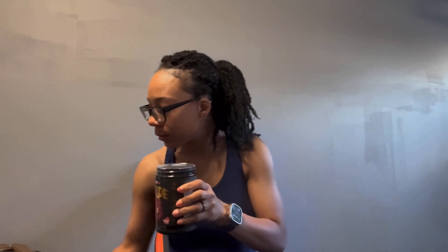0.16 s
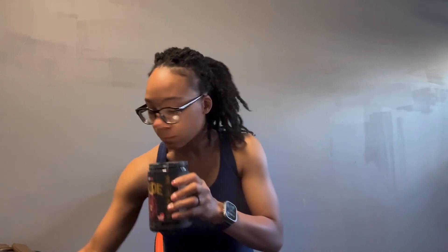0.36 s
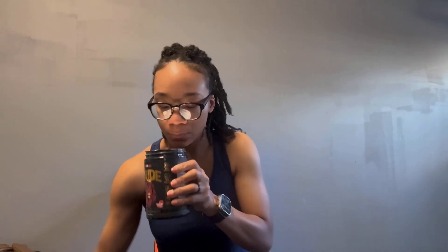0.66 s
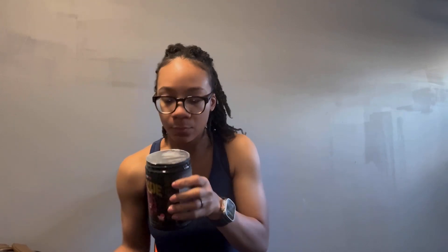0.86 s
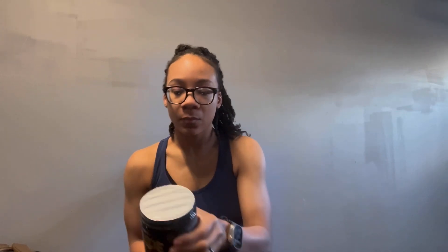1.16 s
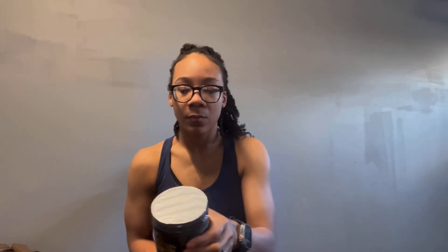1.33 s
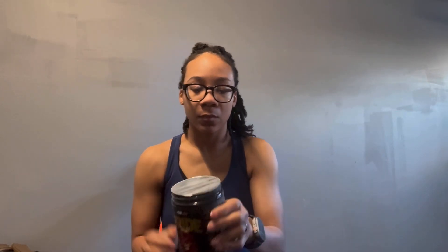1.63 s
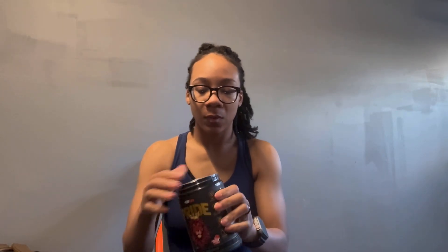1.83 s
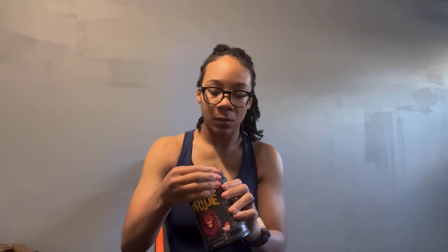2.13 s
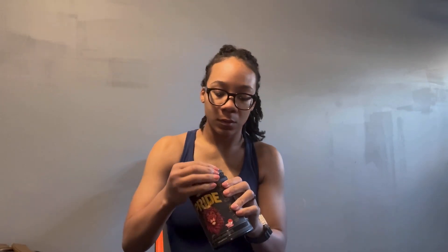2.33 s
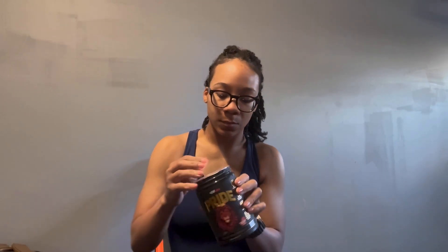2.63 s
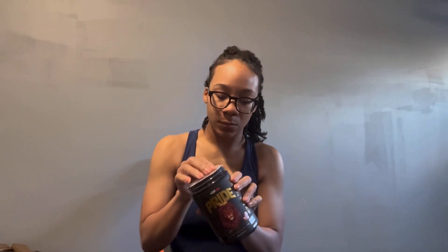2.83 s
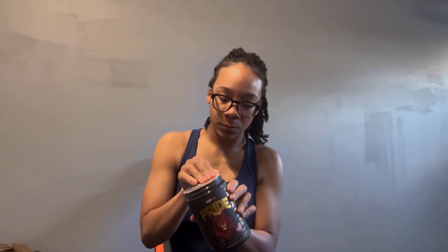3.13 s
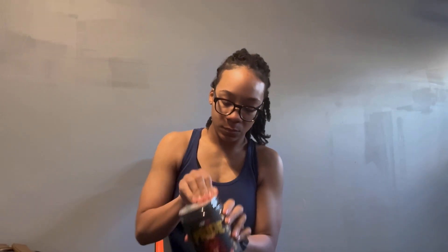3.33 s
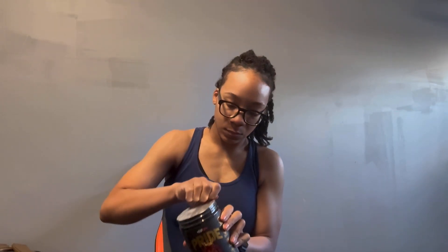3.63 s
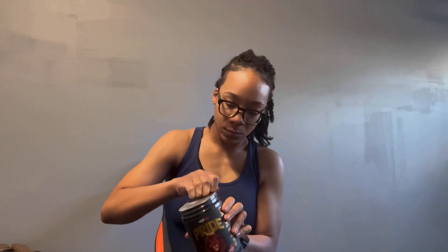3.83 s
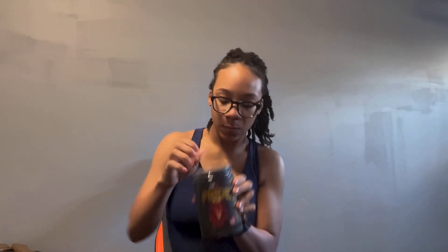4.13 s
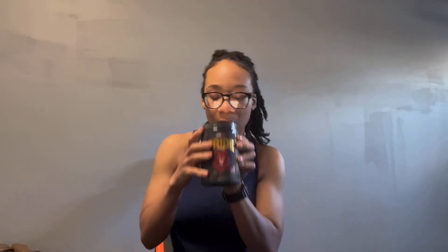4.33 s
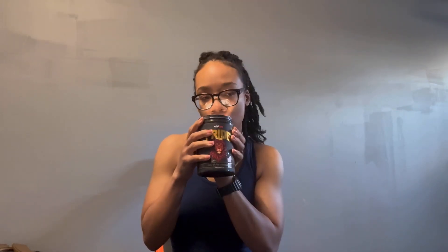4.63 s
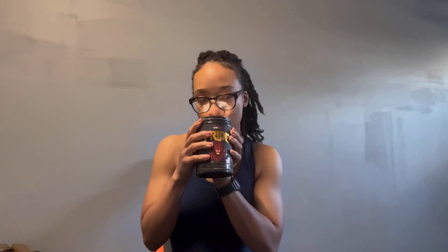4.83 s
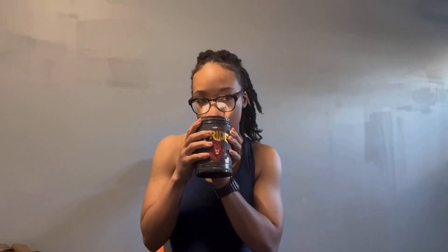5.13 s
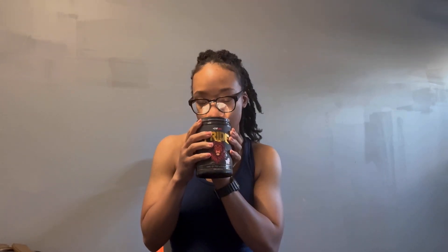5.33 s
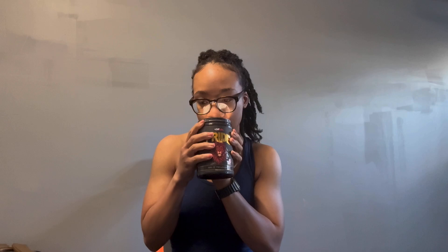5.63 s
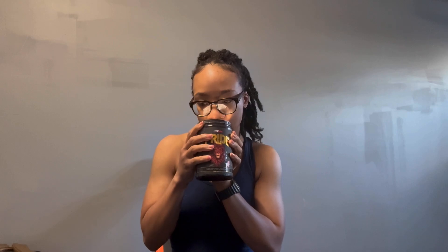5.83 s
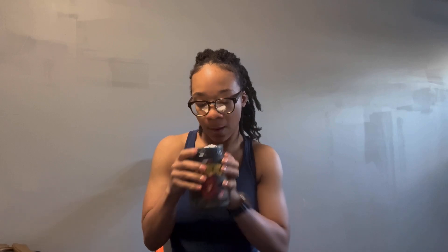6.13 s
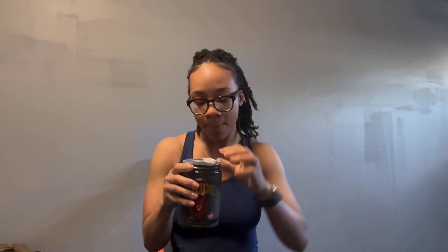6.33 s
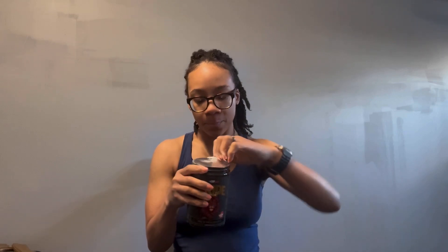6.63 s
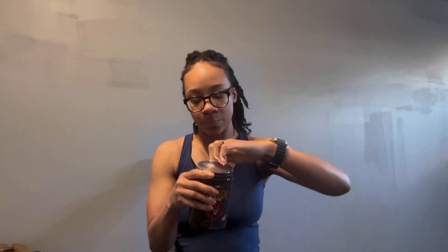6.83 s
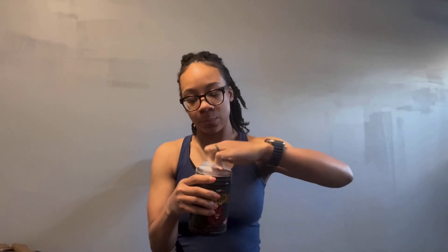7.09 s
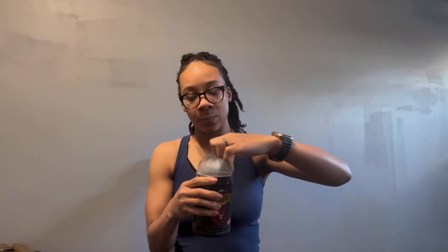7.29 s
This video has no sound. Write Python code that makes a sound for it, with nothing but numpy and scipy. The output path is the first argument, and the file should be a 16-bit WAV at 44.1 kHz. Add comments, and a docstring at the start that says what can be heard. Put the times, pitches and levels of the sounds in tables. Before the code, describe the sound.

Fingernails click and scrape on a plastic tub before its foil seal tears and peels away, with a slight room echo.

```python
"""A bare, echoing room, where hands and teeth open the foil seal of a plastic tub close to two microphone
ports. A distant machine hums under faint air noise. The lid is put down and rocks, fingers slide, and nails tap
and pick: each impact excites damped modes of the plastic. The seal is torn with the teeth, then peels by stick-
slip, its glue letting go in tiny clicks that sound in the foil, the tub wall and the hollow inside. The walls
return it all as diffuse reverberation."""
import sys
import numpy as np
from scipy import signal
from scipy.fft import rfft, irfft
from scipy.io import wavfile

SR = 44100
rng = np.random.default_rng(int(sys.argv[2]) if len(sys.argv) > 2 else 0)


def log_audio(samples):
    """Write samples as a 16-bit WAV file to the path given in sys.argv[1]."""
    # one column per channel
    frames = np.atleast_2d(samples).T
    # limit to full scale, then quantise
    limited = np.clip(frames, -1, 1)
    pcm = np.round(limited * 32767).astype(np.int16)
    wavfile.write(sys.argv[1], SR, pcm)


N = 328809
TIME_S, BINS_HZ = np.arange(N) / SR, np.arange(N // 2 + 1) * SR / N
HALF_OCTAVES_HZ = 25 * 2 ** np.arange(0, 9.6, .5)


def from_db(db):
    """Amplitude ratio of a level in decibels."""
    return 10 ** (np.asarray(db) / 20)


def unit_rms(x):
    """Normalisation to unit power."""
    return x / np.sqrt(np.mean(x ** 2) + 1e-20)


def at_hz(points, hz):
    """Interpolation of a table's second column over log frequency."""
    points = np.array(points)
    return np.interp(np.log(hz), np.log(points[:, 0]), points[:, 1])


def envelope(strokes, column=1):
    """Amplitude envelope: linear in decibels within each stroke, silent outside."""
    return sum(from_db(np.interp(TIME_S, rows[:, 0], rows[:, column], -200, -200))
               for rows in map(np.array, strokes))


def coloured(x, spectrum):
    """Zero-phase filtering by a table of levels over frequency."""
    return irfft(rfft(x) * from_db(at_hz(spectrum, np.maximum(BINS_HZ, 1))), N)


def band(x, low_hz, high_hz):
    """Butterworth band-pass filtering."""
    return signal.sosfilt(signal.butter(2, [low_hz, high_hz], "band", fs=SR, output="sos"), x)


def drift(rate_hz):
    """Random modulation: straight lines between Gaussian values."""
    knots = rng.standard_normal(int(N / SR * rate_hz) + 3)
    return np.interp(TIME_S * rate_hz, np.arange(len(knots)), knots)


def ring(force, hz, t60_s):
    """Damped harmonic oscillator: a unit impulse starts a decaying unit sine."""
    decay, step = from_db(-60 / (t60_s * SR)), 2 * np.pi * hz / SR
    return signal.lfilter([0, np.sin(step)], [1, -2 * decay * np.cos(step), decay ** 2], force + 1e-18)


# Spectrum of the room's rumble and hiss: frequency_hz, density_db
AIR_SPECTRUM = [(30, -3), (55, -4.5), (80, -2), (100, -6), (160, -11), (260, -10), (420, -15), (900, -25.5),
                (1900, -34), (3300, -37.5), (6300, -43), (14000, -43.5)]


def air(level_db=-65):
    """Ambient noise: long wavelengths reach both ports more nearly alike."""
    mid, side = (coloured(noise, AIR_SPECTRUM) for noise in rng.standard_normal((2, N)))
    side = coloured(side, [(60, -7.5), (300, 0)])
    return from_db(level_db) * unit_rms(mid + side * [[1], [-1]])


# Rough tones of the machine: pitch_hz, bandwidth_hz, relative_db
HUM_TONES = [(76, 16, -6.5), (148.8, 15, -13), (223, 9.7, -9), (52.2, 9.2, -18)]
# Swell and fall of the whole hum: time_s, level_db
HUM_SWELL = [
    [(0.0, -62), (0.5, -57.5), (1.74, -64), (2.49, -60), (4.88, -60), (5.3, -67.5), (5.81, -59), (6.5, -63),
     (7.46, -57)],
]


def machine(mains_hz=120.4):
    """Narrow-band noise from resonators, around a wavering mains tone, makes a distant hum."""
    hum = from_db(-1 + 1.6 * drift(11)) * np.sin(2 * np.pi * mains_hz * TIME_S)
    for hz, width_hz, level_db in HUM_TONES:
        mid, side = ring(rng.standard_normal((2, N)), hz, t60_s=np.log(1000) / (np.pi * width_hz))
        hum = hum + from_db(level_db) * unit_rms(mid + 0.29 * side * [[1], [-1]])
    return envelope(HUM_SWELL) * hum


# Reverberation of the bare walls: frequency_hz, t60_s, relative_db
ROOM_DECAY = [(147, 1, -6), (400, 0.73, -0.5), (1020, 0.66, -2), (2800, 0.53, 1.5), (7170, 0.48, -0.5),
              (13800, 0.094, 5)]
# Likeness of the echoes at left and right: frequency_hz, coherence
ROOM_COHERENCE = [(60, 1), (300, 0.54), (700, 0.043), (3000, 0.072), (14000, 0.017)]


def room(x, gain_db=-32.5, gap_s=0.007, patterns=5, pattern_s=0.3):
    """Diffuse reverberation: each half octave of the echoes decays exponentially at its own rate."""
    t, echoes = np.arange(SR) / SR, np.zeros((patterns, 2, SR))
    white = rng.standard_normal((2, 2, SR))
    for k, (low, high) in enumerate(zip(HALF_OCTAVES_HZ[3:], HALF_OCTAVES_HZ[4:])):
        hz = np.sqrt(low * high)
        mid, side = band(white[k % 2], low, high)
        coherence = at_hz(ROOM_COHERENCE, hz)
        noise = np.sqrt(1 + coherence) * mid + np.sqrt(1 - coherence) * side * [[1], [-1]]
        band_db = at_hz(np.array(ROOM_DECAY)[:, ::2], hz)
        decay = from_db(band_db - 60 * t / at_hz(ROOM_DECAY, hz))
        echoes += [np.roll(noise, -p * SR // patterns, axis=1) * decay for p in range(patterns)]
    echoes *= np.clip(t / gap_s - .5, 0, 1)  # the first reflections arrive after a gap
    reverb = 0
    for p, response in enumerate(echoes):  # the tub moves in the hands, so echo patterns cross-fade
        distance = np.abs((TIME_S / pattern_s - p + 1) % patterns - 1)
        share = np.sqrt(np.clip(1 - distance, 0, 1))
        reverb = reverb + signal.fftconvolve(x[None] * share, response, axes=1)[:, :N]
    return from_db(gain_db) * reverb


# Phase by which the left port leads the right: frequency_hz, lead_rad
PORT_LEAD = [(0, 0.5), (6890, -1.5), (8960, 4.5), (10200, 1.5), (11100, 7.5), (13000, 7), (14200, 9.5),
             (16400, 21)]


def ports(x):
    """Phase and level differences place the direct sound; the right port is a little louder."""
    lead_rad = np.interp(BINS_HZ, *np.transpose(PORT_LEAD))
    left = irfft(rfft(x) * np.exp(1j * lead_rad), N)
    return np.array([from_db(0.37) * left, from_db(1.7) * x])


# Fingers slide, holding steady or fading away: start_s, length_s, first_db, last_db
FINGER_SLIDES = [(0.394, 0.15, -53, -56), (0.85, 0.22, -64, -95), (1.863, 0.27, -72.5, -73),
                 (2.336, 0.13, -73, -73), (3.365, 0.11, -64.5, -69), (4.24, 0.29, -74, -75),
                 (5.873, 0.34, -68, -68), (6.613, 0.029, -59, -77.5)]


def rustle():
    """Sliding friction: skin dragging on lid, foil and label makes grainy noise."""
    grains = rng.standard_normal(N) * from_db(5 * drift(400))
    strokes = [[(start_s, first_db), (start_s + length_s, last_db)]
               for start_s, length_s, first_db, last_db in FINGER_SLIDES]
    return envelope(strokes) * unit_rms(band(grains, 1100, 7700))


# A dull knock on furniture, then nail flicks on the rim: start_s, pitch_hz, level_db, t60_s
STRUCK_MODES = [(1.21, 181, -52.5, 0.28), (1.1113, 2000, -41.5, 0.0072), (2.817, 2100, -34.5, 0.0083),
                (3.6663, 2330, -40, 0.0099), (2.35, 5750, -44.5, 0.012), (3.934, 6050, -39.5, 0.0056),
                (4.307, 1250, -39.5, 0.014), (4.442, 1130, -43, 0.013), (4.756, 4890, -41, 0.0097),
                (6.666, 1970, -35.5, 0.0051)]


def single_rings():
    """Free vibration: each impulse sets one mode ringing."""
    return sum(ring(from_db(level_db) * (np.arange(N) == round(start_s * SR)), hz, t60_s)
               for start_s, hz, level_db, t60_s in STRUCK_MODES)


def impulses(onsets, sizes):
    """Impulse train with its onsets given in samples."""
    train = np.zeros(N)
    np.add.at(train, onsets, sizes)
    return train


def coupling(hz, pitch_hz, db_per_octave):
    """Selective excitation: frequencies far from the pitch of the place touched respond less."""
    return from_db(-db_per_octave * np.minimum(np.abs(np.log2(hz / pitch_hz)), 2.4))


def contacts(onsets, sizes, t60_s, scrape_share=0.4, rise_s=0.0007):
    """Rough contact: the energy divides between an impulse and a short, decaying scrape of noise."""
    clicks = impulses(onsets, sizes)
    up, down = np.exp(-1 / (rise_s * SR)), from_db(-60 / (t60_s * SR))
    energy_norm = np.sqrt((1 - up * down) * (1 - up ** 2) / (1 + up * down))
    swell = signal.lfilter([energy_norm], [1, -up - down, up * down], clicks + 1e-18)
    scrape = np.sqrt(scrape_share) * swell * rng.standard_normal(N)
    return np.sqrt((1 - scrape_share) / (1 - down ** 2)) * clicks + scrape


def cracks(onsets, sizes, pitches_hz, t60_s, db_per_octave, scrape_share=0.4):
    """Broadband transients: each crack is strongest in the half octaves near its own pitch."""
    out = 0
    for hz in HALF_OCTAVES_HZ[11:19]:
        bursts = contacts(onsets, sizes * coupling(hz, pitches_hz, db_per_octave), t60_s, scrape_share)
        out = out + band(bursts, hz / 2 ** .25, hz * 2 ** .25)
    return out


def dents(onsets, sizes, pitches_hz, gain_db=8, t60_cycles=15, rise_s=0.00087):
    """Elastic recovery: each blow dents the wall, which springs back in a few cycles."""
    t = np.arange(SR // 10) / SR
    out, attack = np.zeros(N + len(t)), 1 - np.exp(-t / rise_s)
    for i, size, hz in zip(onsets, sizes, pitches_hz):
        decay = from_db(gain_db - 60 * t * hz / t60_cycles)
        out[i:i + len(t)] += size * np.sin(2 * np.pi * hz * t) * decay * attack
    return out[:N]


def blows(strikes, modes, wall_gain_db, wall_db_per_octave, pad_hz=1446):
    """Modal superposition: each blow rings low wall modes and high rim modes, with a bright snap."""
    start_s, blow_db, wall_hz, rim_db, snap_db = np.transpose(strikes)
    onsets = np.round(start_s * SR).astype(int)
    # a hard nail rings the rim higher than the finger pad: an octave for 19 dB more snap
    rim_hz = pad_hz * 2 ** (np.maximum(snap_db + 9.5, 0) / 19)
    scatter = from_db(2 * rng.standard_normal((len(strikes), len(modes))))
    wall, rim = dents(onsets, from_db(blow_db), wall_hz), 0
    for k, (hz, level_db, t60_s) in enumerate(modes):
        sizes = from_db(blow_db + level_db) * scatter[:, k]
        if hz < 1250:
            sizes *= coupling(hz, wall_hz, wall_db_per_octave) * (-1) ** k
            wall = wall + ring(impulses(onsets, sizes), hz, t60_s)
        else:
            sizes *= from_db(rim_db + 2.5) * coupling(hz, rim_hz, db_per_octave=12.94)
            rim = rim + ring(contacts(onsets, sizes, t60_s=0.0045), hz, t60_s)
    wall = band(band(wall, 70, 1900), 40, 2400)  # the finger pad rounds the push
    rim = band(band(rim, 616, 4470), 400, 4800)
    snap_hz = 5800 * 2 ** (0.38 * rng.standard_normal(len(strikes)))
    snap = cracks(onsets, from_db(blow_db + snap_db + 5.5), snap_hz, t60_s=0.005, db_per_octave=5)
    return from_db(wall_gain_db) * wall + rim + band(snap, 2100, 11600)


# Modes of lid and table top: pitch_hz, relative_db, t60_s
LID_MODES = [(123, -29, 0.018), (172, -9, 0.19), (336, 1, 0.043), (420, -2, 0.036), (533, 2.5, 0.05),
             (786, -8.5, 0.0153), (1243.5, -4, 0.0076), (1550, 6.5, 0.0031), (2100, -26, 0.0022),
             (3020, -7, 0.0061), (4350, 4, 0.0047)]
# Impacts of the lid: start_s, blow_db, wall_pitch_hz, rim_relative_db, snap_relative_db
LID_STRIKES = [(0.383, -32.5, 690, -23, -1), (0.4035, -23.5, 676, -17, 1.5), (0.408, -31, 170, -7, 8.5),
               (0.416, -30, 236, -5.5, 3.5), (0.425, -29.5, 377, -10, -11.5), (0.45, -31, 420, -21, -25),
               (0.476, -27, 546, -20.5, -28), (0.529, -31, 500, -18, -25)]


def lid():
    """Repeated impact: the lid lands and rocks, ringing itself and the table top."""
    return blows(LID_STRIKES, LID_MODES, wall_gain_db=-12.5, wall_db_per_octave=22)


# Modes of the tub's plastic wall and rim: pitch_hz, relative_db, t60_s
TUB_MODES = [(266, -23, 0.032), (390, 1.5, 0.019), (500, 5.5, 0.028), (594, 3, 0.045), (644, -2, 0.043),
             (770, 4.5, 0.03), (855, 6.5, 0.018), (1080, 14, 0.0033), (1270, 0.5, 0.0017),
             (1700, -30, 0.0012), (2260, -8.5, 0.0043), (2750, -15.5, 0.0031), (3075, -14.5, 0.0088),
             (3980, 3.5, 0.0026), (4720, -2, 0.0062), (5280, 0.5, 0.0087)]
# Taps and picks: start_s, blow_db, wall_pitch_hz, rim_relative_db, snap_relative_db
NAIL_STRIKES = [(0.197, -41.5, 450, -13, -46), (0.855, -39, 523, -6.5, -6.5), (0.893, -39.5, 482, -32, -19),
                (1.048, -62.5, 506, -6, 9), (1.1105, -28, 577, -16, -34), (1.138, -30.5, 550, -21.5, -31),
                (1.36, -42.5, 530, -18, -45), (1.568, -52.5, 530, -37, -25), (1.869, -63, 540, -7, 8),
                (1.95, -27.5, 373, -16, -21), (1.958, -30.5, 635, -3, -6), (2.063, -34.5, 732, -8.5, -23),
                (2.314, -41, 318, -10, -16), (2.349, -43, 466, -4.5, 3), (2.434, -33.5, 342, -9, -9),
                (2.455, -35.5, 456, -24, -17), (2.749, -30, 460, -15, -33), (2.753, -25.5, 517, -6, -21),
                (2.785, -26, 607, -29, -24), (2.801, -37, 610, -8, -1), (2.817, -35, 410, -10, 0),
                (2.897, -28, 860, -9.5, -0.5), (2.9005, -25, 810, -10, -8), (2.981, -56, 830, 14, -11),
                (3.13, -50, 890, -2, 10.5), (3.344, -31.5, 673, -11.5, -28), (3.369, -35, 588, -24, -30),
                (3.4, -31.5, 710, -22, -35), (3.435, -40.5, 507, -3.5, 6.5),
                (3.4455, -37.5, 353, -2.5, 7.5), (3.512, -52, 480, 7.5, -1), (3.666, -43.5, 515, -11, -31),
                (3.744, -39, 301, 2.5, -12), (3.922, -60, 610, -3, 17), (3.934, -47.5, 500, -2, 9.5),
                (3.937, -39.5, 500, -10, -0.5), (3.944, -31, 518, -8, -23), (4.18, -38.5, 426, -35, -42),
                (4.258, -39.5, 390, -13.5, -7.5), (4.307, -41, 720, -8, -13), (4.341, -33, 610, -28, -34),
                (4.353, -35, 1090, -21, -31), (4.362, -41, 594, -35, -38), (4.399, -34.5, 510, -13, -35),
                (4.443, -26.5, 580, -16.5, -32), (4.499, -37.5, 448, -27, -35),
                (4.754, -41, 458, -2.5, 0.5), (4.837, -38.5, 783, -7.5, -19), (5.975, -45, 500, -7, -6),
                (6.052, -47, 510, -27, -4), (6.0935, -27.5, 850, -7.5, -7), (6.0965, -21, 733, -21, -26),
                (6.184, -37.5, 556, -8, -22), (6.583, -41, 723, -26, -32), (6.612, -45, 440, -18, -31),
                (6.663, -41.5, 576, -6, -29), (6.882, -46.5, 370, -5, -4), (6.921, -50, 390, -8.5, 5.5)]


def nail_taps():
    """Impact excitation: nails ring the tub's wall and rim and snap the foil."""
    return blows(NAIL_STRIKES, TUB_MODES, wall_gain_db=-11.5, wall_db_per_octave=13.5)


# Swells of the air in the tub: peak_s, level_db, pitch_hz, glide_octaves_per_s, fade_db_per_s
CAVITY_SWELLS = [(7.098, -36.5, 590, -6, 255), (7.2, -48.5, 236, -4.5, 84), (7.35, -36.5, 805, 1.5, 260)]


def cavity(slips, width_hz=230):
    """Cavity resonance: the hollow answers through the gap, swelling and fading as its pitch glides."""
    out, pole = np.zeros(N), np.exp(-np.pi * width_hz / SR)
    for peak_s, level_db, hz, glide, fade in CAVITY_SWELLS:
        start = int((peak_s - .5) * SR)
        t = TIME_S[start:] - peak_s
        pitch_hz = hz * 2 ** (glide * np.clip(t, -.2, .2))
        carrier = np.exp(2j * np.pi * np.cumsum(pitch_hz) / SR)
        # a moving band-pass: shift down by the pitch, smooth, shift back
        baseband = signal.lfilter([1], [1, -2 * pole, pole ** 2], slips[start:] / carrier)
        out[start:] += from_db(level_db - fade * np.abs(t)) * unit_rms(np.real(carrier * baseband))
    return out


# Radiation of the foil: frequency_hz, density_db
FOIL_SPECTRUM = [(500, -26.5), (900, -6), (1400, -7.5), (2200, -10), (3700, -12.5), (7500, -12.5),
                 (13000, -16), (16500, -40)]
# Loud single snaps of the seal: start_s, strength_db, pitch_hz
SEAL_SNAPS = [(5.594, -30, 3100), (5.611, -28, 2200), (5.622, -19.5, 2500), (5.632, -21, 3000),
              (5.663, -18, 6000), (6.9833, -14.5, 6650), (6.994, -28, 5500), (7.001, -16.5, 6600),
              (7.027, -17.5, 4200), (7.032, -23, 6500), (7.045, -18, 5500), (7.065, -11, 5000),
              (7.082, -12, 2800), (7.095, -19, 3500), (7.107, -29, 7000), (7.117, -25, 3800),
              (7.125, -18, 3600), (7.141, -24, 2200), (7.252, -25, 5000), (7.311, -18, 4500),
              (7.336, -15, 5300), (7.351, -19, 4000), (7.374, -24, 5000), (7.394, -19, 3100),
              (7.414, -26, 2500)]
# Two pulls, the tear and then the peel: time_s, foil_db, wall_db
SEAL_PULLS = [
    [(5.588, -59, -78), (5.605, -45, -55), (5.635, -40, -46), (5.67, -42.5, -50.5), (5.72, -62, -43)],
    [(6.984, -43, -43.5), (7.022, -43, -51), (7.045, -34, -50), (7.1, -33.5, -41), (7.135, -38.5, -47),
     (7.19, -41.5, -59), (7.235, -44, -54), (7.27, -38.5, -40.5), (7.303, -40.5, -44.5), (7.318, -32, -40),
     (7.35, -36.5, -36.5), (7.4, -36.5, -54), (7.43, -49, -49), (7.456, -48, -47)],
]


def seal(median_slips_per_s=1500):
    """Stick-slip: glue lets go in clumps of tiny clicks that drive the foil, the wall and the cavity."""
    sizes = from_db(4.7 * np.minimum(rng.exponential(1, N), 3)) * rng.choice([-1, 1], N)
    slipping = rng.random(N) < median_slips_per_s * from_db(6 * drift(90)) / SR
    slips = unit_rms(sizes * slipping)
    start_s, strength_db, pitch_hz = np.transpose(SEAL_SNAPS)
    onsets = np.round(start_s * SR).astype(int)
    snaps = cracks(onsets, from_db(strength_db), pitch_hz, t60_s=0.004, db_per_octave=7, scrape_share=.45)
    foil_rms = np.sqrt(np.mean(from_db(at_hz(FOIL_SPECTRUM, np.linspace(20, SR / 2, 500))) ** 2))
    foil = coloured(envelope(SEAL_PULLS) * slips + snaps, FOIL_SPECTRUM) / foil_rms
    wall = unit_rms(sum(from_db(db) * ring(slips, hz, t60_s) for hz, db, t60_s in TUB_MODES[:8]))
    return foil + envelope(SEAL_PULLS, column=2) * wall + cavity(slips)


def scene():
    """Superposition of the close sources' direct sound, their reverberation and the background."""
    taps, landing = nail_taps(), lid()
    tub = band(taps + seal(), 217, 14000)  # a small tub radiates no bass
    near = tub + landing + rustle() + single_rings()
    return ports(near) + room(near) + air() + machine()


# Sensitivity of the microphone: frequency_hz, gain_db
MICROPHONE_RESPONSE = [(25, -27.5), (45, 2.5), (7500, -3.5), (8800, -5.5), (9900, -14.5), (11500, -6),
                       (13500, -4.5), (14800, -4), (16000, -20)]


def record(dry):
    """Frequency response: the microphone colours the sound, then a steep low-pass cuts the top."""
    heard = np.array([coloured(channel, MICROPHONE_RESPONSE) for channel in dry])
    return signal.sosfilt(signal.cheby2(12, 70, 16800, fs=SR, output="sos"), heard)


dry = scene()
out = record(dry)
log_audio(out)
```